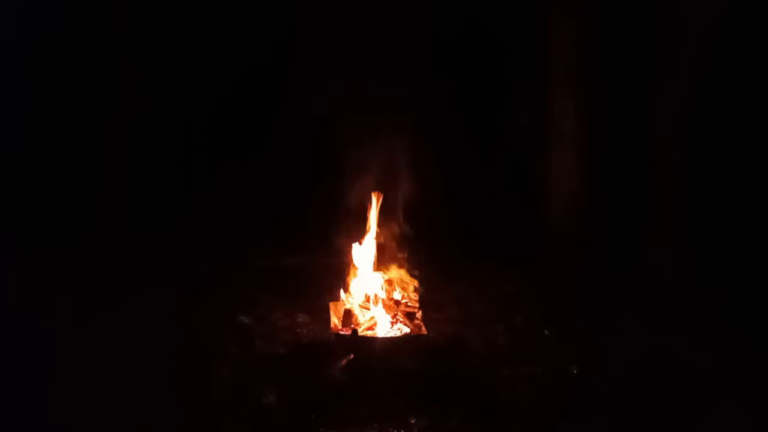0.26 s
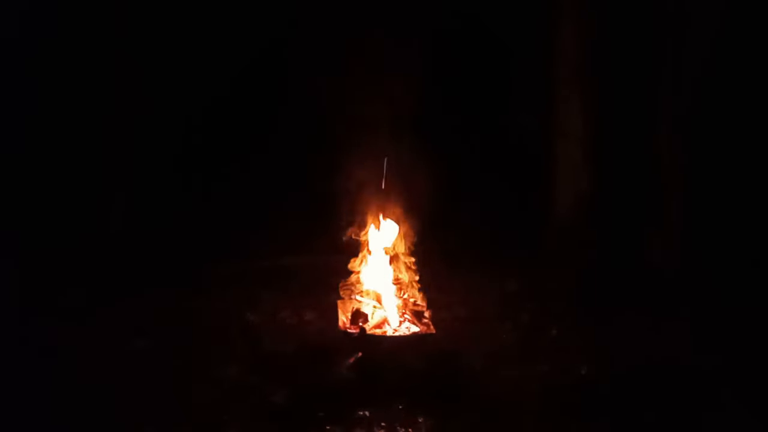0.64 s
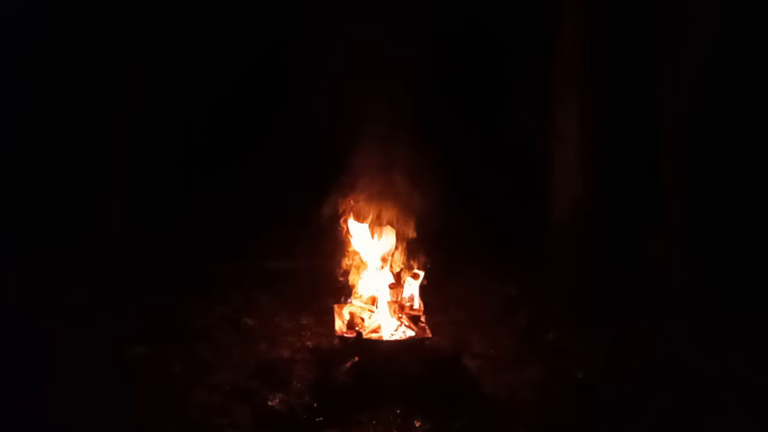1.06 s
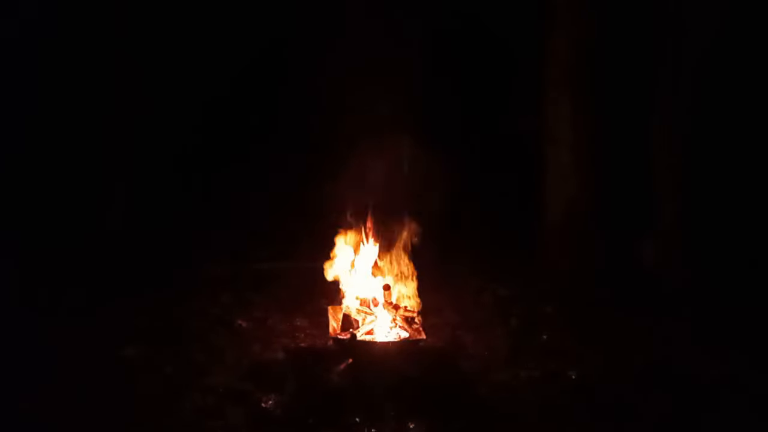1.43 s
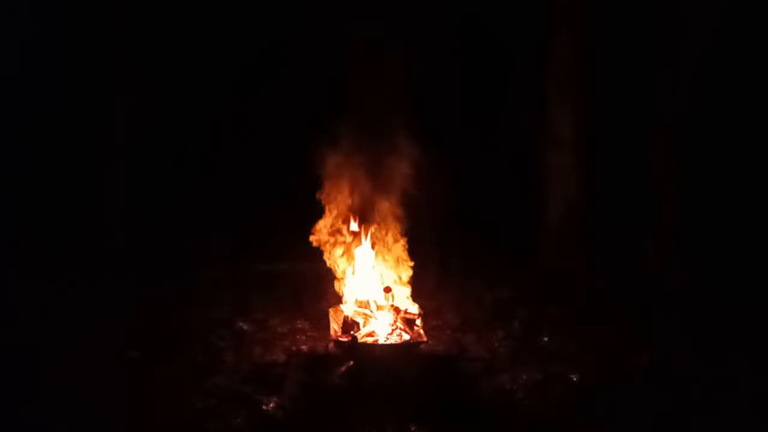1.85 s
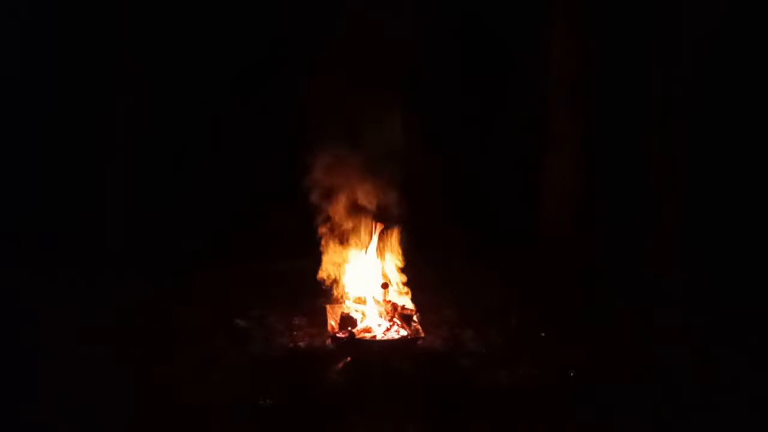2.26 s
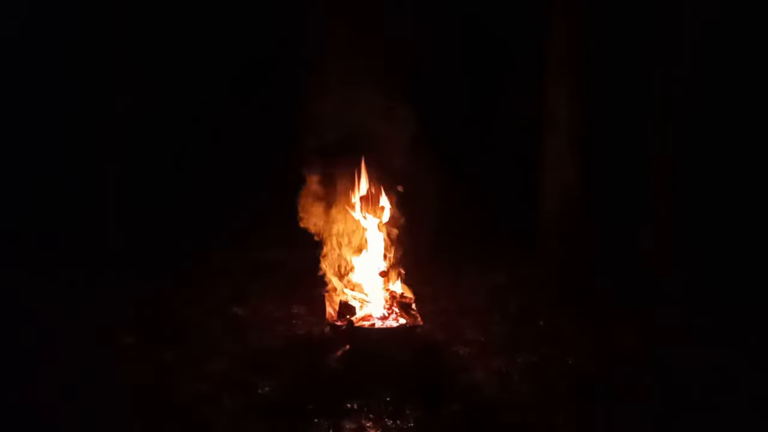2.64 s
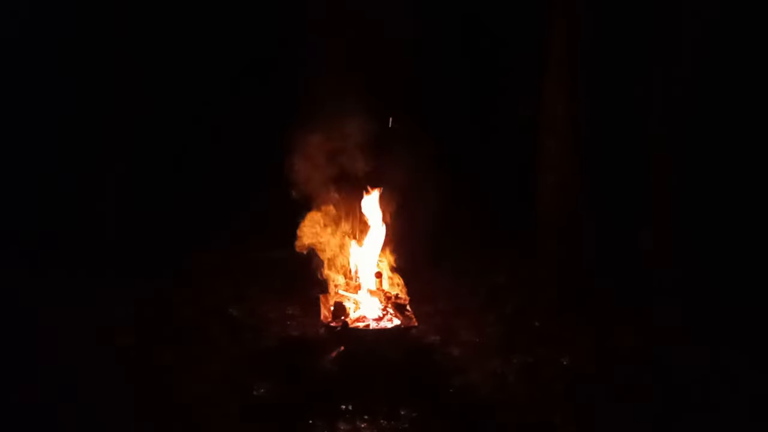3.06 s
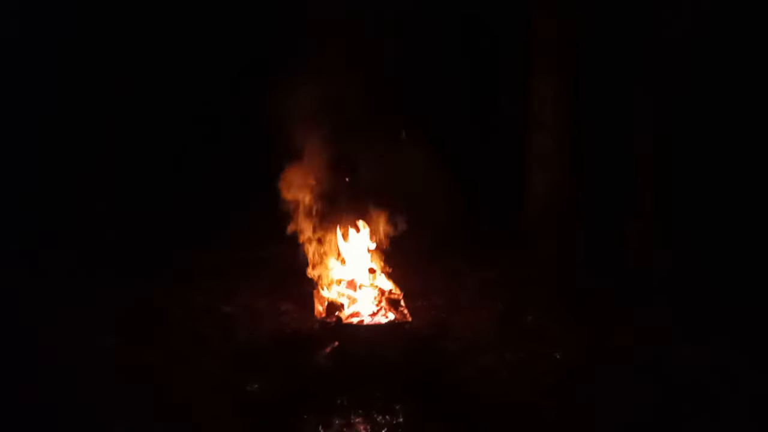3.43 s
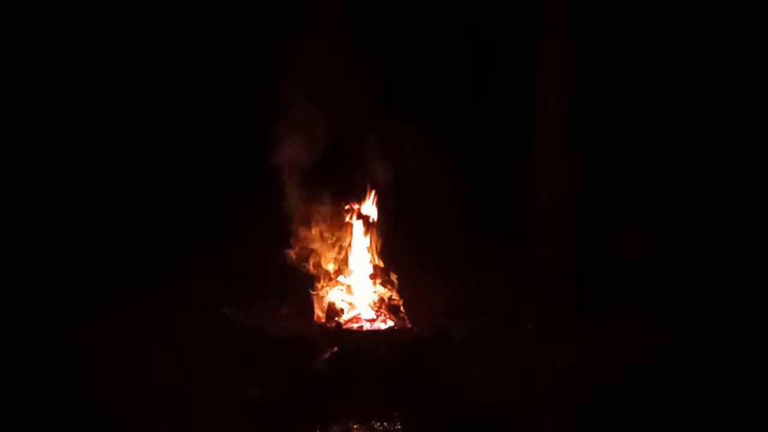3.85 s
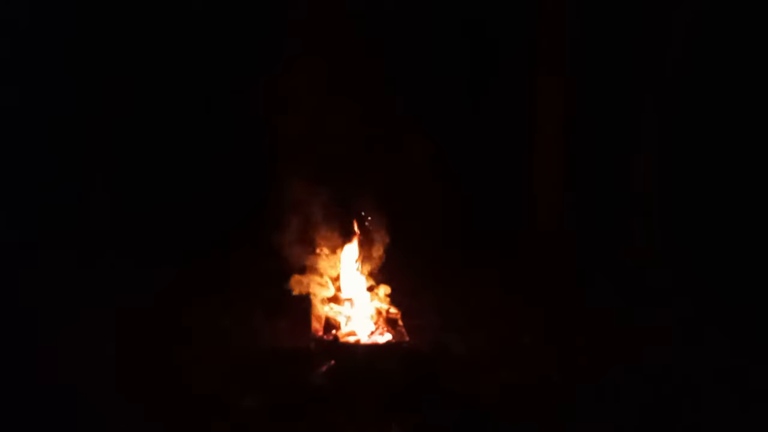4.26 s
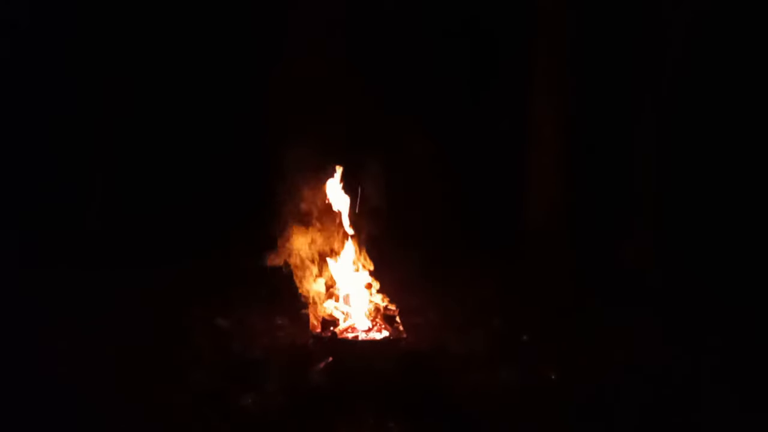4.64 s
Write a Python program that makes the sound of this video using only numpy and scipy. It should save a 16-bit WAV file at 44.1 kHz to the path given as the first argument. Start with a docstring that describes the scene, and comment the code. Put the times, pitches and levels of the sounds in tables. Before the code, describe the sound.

Fat raindrops thump and splash on stretched cloth while light rain falls on leaves and a campfire faintly sizzles and snaps.

```python
"""Heavy drips from the trees drum on a taut rain canopy overhead, in a wet wood at night.
Each one thumps the stretched cloth, knocks a panel and bursts into spray.
A few steps away a wood fire hisses and puffs, its logs snapping and spitting steam,
while fine rain patters on the leaf litter all around."""
import sys
import numpy as np
from scipy import signal
from scipy.io import wavfile

SR = 44100
rng = np.random.default_rng(int(sys.argv[2]) if len(sys.argv) > 2 else 0)


def master_out(mix):
    """Clip the mix to full scale and print it as 16-bit PCM to the path in sys.argv[1]."""
    frames = np.transpose(np.atleast_2d(mix))
    ceiling = np.clip(frames, -1, 1)
    pcm = np.round(ceiling * 32767).astype(np.int16)
    wavfile.write(sys.argv[1], SR, pcm)


N = 215857


def from_db(db):
    return 10 ** (np.asarray(db) / 20)


def rms_one(x):
    return x / np.sqrt(np.mean(x ** 2) + 1e-20)


def band(x, low_hz, high_hz):
    sos = signal.butter(2, [low_hz, min(high_hz, .45 * SR)], "band", fs=SR, output="sos")
    return signal.sosfilt(sos, x)


def fade(t, t60):
    return from_db(-60 * t / t60)


def swell(t, rise_s, t60):
    return (1 - np.exp(-t / rise_s)) * fade(t, t60)


def struck(t, hz, rise_s, t60, sag=0):
    """A briefly pushed mode that starts sharp by the fraction sag, settles and dies away."""
    turns = hz * (t + sag * rise_s * (1 - np.exp(-t / rise_s)))
    return swell(t, rise_s, t60) * np.sin(2 * np.pi * turns)


def place(times, shapes):
    """Lay each row of shapes down at its time."""
    out = np.zeros(N + shapes.shape[1])
    for start, shape in zip(times, shapes):
        out[round(start * SR):][:len(shape)] += shape
    return out[:N]


def drift(hz):
    """A slow random wander; rms 1."""
    pole = np.exp(-80 * np.pi * hz / SR)
    noise = rng.standard_normal(N // 40 + 2002)
    slow = signal.lfilter([1], [1, -2 * pole, pole * pole], noise)[2000:]
    return np.interp(np.arange(N) / 40, np.arange(len(slow)), rms_one(slow))


def grains(per_s, spread_db):
    """Two unrelated streams of random clicks with uneven sizes."""
    sizes = from_db(spread_db * np.minimum(rng.exponential(1, (2, N)), 5))
    signs = rng.choice([-1, 1], (2, N))
    return sizes * signs * (rng.random((2, N)) < per_s / SR) + 1e-18


def coloured(streams, spectrum, flicker_db):
    """Third-octave bands from two streams in turn, each with its own level and flicker; rms 1."""
    out, together = 0, drift(30)
    edges = 25 * 2 ** np.arange(0, 9.6, 1 / 3)
    hz, level_db = np.transpose(spectrum)
    for k, (low, high) in enumerate(zip(edges, edges[1:])):
        centre = np.sqrt(low * high)
        if hz[0] <= centre <= 1.2 * hz[-1]:
            band_db = np.interp(np.log(centre), np.log(hz), level_db)
            wander_db = flicker_db * (together + drift(20))
            out += from_db(band_db + wander_db) * band(streams[k % 2], low, high)
    return rms_one(out)


def ringing(clicks, low_hz, high_hz, width, tilt):
    """Clicks dealt to short resonances spread evenly in pitch; rms 1."""
    out, dealt = 0, rng.integers(0, 14, N)
    for k, hz in enumerate(np.geomspace(low_hz, high_hz, num=14)):
        share = clicks * (dealt == k) + 1e-18
        out += band(share, hz / (1 + width), hz * (1 + width)) / hz ** tilt
    return rms_one(out)


# Tone of the low end. Each row: frequency in Hz, relative spectral level in dB.
RUMBLE_TONE = [(25, -1), (45, -7), (70, 5.5), (110, 10.5), (170, -1), (260, -24)]
# Flaps of the flames. Each row: peak time in seconds, level in dB.
FLAME_PUFFS = [(0.821, -54), (1.36, -54.5), (1.57, -56), (1.9, -48.5), (2.06, -63), (2.5, -47), (2.63, -65),
               (3.3, -64), (3.87, -55)]


def rumble(heave_power):
    """A low floor that swells as the flames flap and the canopy heaves."""
    t = np.arange(N) / SR
    floor_db, puff_width_s = -74, .016
    power = from_db(floor_db) ** 2 + heave_power
    for peak_s, db in FLAME_PUFFS:
        power += from_db(db) ** 2 * np.exp(-((t - peak_s) / puff_width_s) ** 2)
    return np.sqrt(power) * coloured(rng.standard_normal((2, N)), RUMBLE_TONE, flicker_db=1.0)


def leaf_ticks():
    """Small drops land on nearby leaves as short ticks of uneven colour."""
    clicks = grains(per_s=400, spread_db=4.0)[0]
    return from_db(-72.5) * ringing(clicks, 957, 8900, width=.2, tilt=1.0)


# Fader moves for the two beds. Each row: time in seconds, rain patter in dB, fire hiss in dB.
BED_LEVELS = [(0.0, -55.5, -56.5), (0.2, -57.5, -55.5), (0.5, -50, -55), (0.9, -55.5, -54), (1.3, -57, -54),
              (1.75, -53.5, -53.5), (2.2, -55.5, -54.5), (2.35, -54.5, -51.5), (2.47, -49.5, -46.5),
              (2.65, -49.5, -52.5), (2.92, -58, -54.5), (3.3, -53, -56.5), (3.75, -56, -56.5),
              (4.05, -56.5, -56), (4.22, -55, -52), (4.5, -56, -55), (4.89, -58.5, -56.5)]


def bed_gains():
    """The patter and the hiss each ride gently up and down."""
    times, *levels = np.transpose(BED_LEVELS)
    return [from_db(np.interp(np.arange(N) / SR, times, db)) for db in levels]


# Tone of rain on leaf litter. Each row: frequency in Hz, relative spectral level in dB.
PATTER_TONE = [(130, 4.5), (230, 13.5), (410, 6.5), (650, 10), (1300, 10), (2500, 9), (4000, 6), (6000, 8),
               (8000, -4), (12000, -20)]


def rain_patter(gain, runoff_power):
    """Fine rain on the leaf litter, joined by spray that each drip shakes loose."""
    drops = grains(per_s=1800, spread_db=1.93)
    return np.sqrt(gain ** 2 + runoff_power) * coloured(drops, PATTER_TONE, flicker_db=2.0)


# Tone of the fire's hiss. Each row: frequency in Hz, relative spectral level in dB.
HISS_TONE = [(4000, 17), (7000, -20), (9000, 10.5), (16000, 17.5)]


def fire_hiss(gain):
    """The fire sizzles with a dense, bright stream of tiny clicks."""
    return gain * coloured(grains(per_s=9000, spread_db=4.6), HISS_TONE, flicker_db=1.5)


# Snaps of the logs. Each row: start in seconds, treble gain in dB, top-end gain in dB,
# time for the spit to fall 60 dB in seconds.
LOG_SNAPS = [(0.3604, -32, -49, 0.011), (0.375, -25.5, -30, 0.06), (0.39, -42, -45, 0.057),
             (0.523, -39, -32, 0.055), (0.6125, -31.5, -24, 0.04), (0.7869, -32.5, -20.5, 0.016),
             (0.9835, -42, -24, 0.035), (0.9902, -52, -39, 0.028), (1.3064, -33.5, -26, 0.017),
             (1.322, -40, -29, 0.038), (1.3527, -40.5, -46, 0.031), (1.6663, -42, -30, 0.02),
             (1.9974, -34, -45, 0.011), (2.038, -41.5, -30.5, 0.13), (2.1643, -37, -15, 0.014),
             (2.1785, -39, -34, 0.047), (2.1837, -31.5, -33, 0.024), (2.287, -36, -41, 0.034),
             (2.3915, -47, -33, 0.049), (2.4589, -43.5, -43, 0.14), (2.49, -36.5, -27, 0.1),
             (2.534, -41, -46, 0.02), (2.7165, -34, -32, 0.045), (2.795, -36.5, -31, 0.038),
             (2.804, -49, -27, 0.046), (3.17, -35.5, -32, 0.029), (3.1835, -37, -51, 0.027),
             (3.692, -41, -52, 0.076), (3.838, -52, -31, 0.039), (3.845, -36.5, -40, 0.054),
             (3.872, -43, -33, 0.08), (3.8778, -49, -37, 0.085), (3.9342, -37, -39, 0.026),
             (3.9704, -32, -50, 0.014), (4.1028, -37.5, -48, 0.021), (4.144, -43, -42, 0.13),
             (4.198, -37, -55, 0.052), (4.316, -53, -29, 0.023)]


def log_snaps():
    """A cell of wood bursts with a click and vents a short spit of steam."""
    start, treble_db, top_db, spit_t60 = np.transpose(LOG_SNAPS)[:, :, None]
    t = np.arange(round(.08 * SR)) / SR
    click = fade(t, t60=.004)
    spit = from_db(-1.5) * swell(t, rise_s=.001, t60=spit_t60)
    bursts = rng.standard_normal((len(LOG_SNAPS), 2, len(t))) * (click + spit)[:, None]
    treble = from_db(treble_db) * band(bursts[:, 0], 5500, 12000)
    top = from_db(top_db) * band(bursts[:, 1], 13250, .45 * SR)
    return place(start[:, 0], treble + top)


def spray(t, count):
    """Droplets fly off each drip: ten tiny rings of chance pitch, size and delay, most of them early."""
    pitch, size, lag = rng.random((count, 3, 10, 1)).transpose(1, 0, 2, 3)
    since = np.maximum(t - .002 * lag ** 2.553, 0)
    rings = struck(since, 1300 * 5.5 ** pitch, rise_s=.0018, t60=.005)
    return (from_db(-14 * size) * rings).sum(axis=1)


def crack(t, lag_s=.000793, width_s=.00005):
    """The drop bursts with one hard pressure swing of height 1."""
    u = (t - lag_s) / width_s
    return -u * np.exp((1 - u ** 2) / 2)


# Cloth rustle bands, following the thump, knock and spray in that order. Each row: lowest and
# highest resonance in Hz, level against that part of the drip in dB, time to fall 60 dB in seconds.
RUSTLE_BANDS = [(164, 386.4, -17.5, 0.091), (431, 1348, -14, 0.052), (1300, 6350, -21.5, 0.099)]


def cloth_rustle(thump_db, knock_db, spray_db):
    """The cloth rustles on after each drip."""
    out = 0
    for (low_hz, high_hz, offset_db, t60), db in zip(RUSTLE_BANDS, (thump_db, knock_db, spray_db)):
        power = after_drips(db + offset_db, rise_s=.0035, t60=t60)
        clicks = grains(per_s=3000, spread_db=1.6)[0]
        out += np.sqrt(power) * ringing(clicks, low_hz, high_hz, width=.03, tilt=.4)
    return out


# Drips on the canopy. Each row: start in seconds, thump gain in dB and pitch in Hz, knock gain in dB
# and pitch in Hz, splash gain in dB and pitch in Hz, spray gain in dB.
CANOPY_DRIPS = [(0.0107, -54, 204, -34.5, 666, -33, 1750, -26),
                (0.0928, -49, 211, -33.5, 1260, -32, 3180, -27.5),
                (0.1116, -42, 410, -32.5, 1195, -36, 3200, -27.5),
                (0.2848, -16, 263, -33.5, 434, -21.5, 2720, -22.5),
                (0.3474, -33, 420, -36, 1190, -43, 1490.0, -24),
                (0.361, -23, 268, -17.5, 713, -18.5, 1300.0, -18.5),
                (0.384, -40, 304, -25, 692, -32, 1300.0, -37), (0.447, -45, 230, -29, 1010, -27, 2520, -32),
                (0.4525, -19.5, 224, -21.5, 437, -15.5, 3680, -14.5),
                (0.515, -24.5, 286, -25, 483, -16, 2540, -18.5),
                (0.534, -18, 244, -18.5, 470, -14.5, 1500, -12),
                (0.564, -34, 226, -29.5, 655, -24, 1650, -19.5),
                (0.6124, -60, 170.0, -54, 1280.0, -25.5, 6070, -57),
                (0.641, -20.5, 207, -21, 457, -28, 6470, -26.5),
                (0.7653, -49, 222, -31.5, 730, -31, 1300.0, -33),
                (0.7839, -44, 208, -30, 1300.0, -56, 1300.0, -30),
                (0.8927, -29, 324, -63, 525, -39, 5100, -34),
                (0.9293, -34, 278, -35, 490, -33, 1780, -22.5),
                (0.9899, -34, 172, -38, 1300.0, -19, 4180, -14.5),
                (1.012, -48, 275, -27.5, 1300.0, -36, 4000, -55),
                (1.1063, -20.5, 248, -69, 480.0, -32, 2760, -34.5),
                (1.1367, -34.5, 220, -34.5, 1210, -49, 1300.0, -28),
                (1.2633, -58, 256, -41.5, 675, -39, 6100, -26.5),
                (1.3046, -44, 300.0, -26, 497, -24, 1800, -20.5),
                (1.321, -16, 243, -19, 627, -17, 2370, -14.5), (1.5789, -23, 242, -29, 704, -34, 1520, -36),
                (1.606, -22.5, 250, -15, 930, -17, 1760, -20),
                (1.6172, -54, 274, -22.5, 780, -20.5, 1870, -37),
                (1.6407, -34, 346, -24.5, 890, -19, 1980, -19),
                (1.6834, -28.5, 260.0, -32, 490, -40, 1730, -24),
                (1.7111, -45, 310.0, -32, 550, -26.5, 2580, -25.5),
                (1.8013, -24, 234, -46, 590, -17, 2590, -17),
                (1.835, -29.5, 250.0, -42, 746, -33, 2660, -43),
                (1.8655, -36, 355, -51, 480.0, -32, 2130, -32),
                (1.877, -28.5, 363, -47, 585, -41, 1970, -18.5),
                (1.8886, -20.5, 241, -28, 456, -24, 3750, -27),
                (1.9674, -51, 200.0, -41, 1240, -39, 1300.0, -35),
                (1.984, -50, 284, -41, 1310, -28, 4700, -35),
                (2.0147, -41, 390, -53, 670, -33, 3350.0, -24.5),
                (2.1692, -54, 300.0, -55, 1280, -36, 3980, -32),
                (2.2863, -23.5, 232, -19, 575, -22, 5680, -23),
                (2.3536, -18, 208, -7, 664, -51, 1300.0, -21.5),
                (2.3753, -30, 193, -23, 620, -31, 1900, -17),
                (2.3914, -21.5, 230, -23, 593, -25, 3870, -15.5),
                (2.4603, -31.5, 190.0, -48, 890, -27.5, 3700, -31),
                (2.467, -41, 212, -36, 880, -48, 1600, -21.5), (2.48, -30, 178, -35, 760, -28, 3170, -23),
                (2.4919, -30.5, 193, -44, 596, -27, 3650, -24),
                (2.5952, -31, 206, -38, 474, -28.5, 3250, -46),
                (2.6315, -32.5, 355, -42, 640, -30.5, 4140, -35.5),
                (2.6543, -49, 270.0, -31, 497, -34, 2700, -30),
                (2.7216, -28.5, 245, -23.5, 440, -33, 1540, -26),
                (2.7354, -33, 225, -27.5, 720.0, -43, 4070, -52),
                (2.796, -28, 220, -28, 483, -28.5, 4950, -24),
                (2.9742, -20, 249, -20, 493, -9.5, 3000, -16.5), (3, -61, 260.0, -44, 1190, -29, 6670, -31),
                (3.087, -34, 300.0, -32.5, 666, -27.5, 2720, -27.5),
                (3.1654, -27, 234, -24.5, 900, -31, 2050, -23),
                (3.1702, -23.5, 214, -11.5, 630, -14, 3190, -12),
                (3.2042, -20, 213, -16.5, 536, -31, 6700, -22),
                (3.2721, -35, 298, -33, 574, -22.5, 1540, -22),
                (3.288, -17, 277, -24, 429, -15.5, 3140, -16.5),
                (3.409, -33.5, 252, -40, 774, -36, 4940, -20), (3.43, -25, 246, -11.5, 968, -23, 2720, -15),
                (3.5592, -33.5, 235, -33.5, 764, -22.5, 1790, -25),
                (3.6924, -34, 290, -29.5, 1124, -22.5, 1510, -23),
                (3.7227, -42.5, 225, -33, 980, -32, 2180, -35.5),
                (3.8459, -19.5, 253, -27.5, 470, -17.5, 1970, -19.5),
                (3.8627, -17.5, 254, -24.5, 440, -16.5, 2840, -12.5),
                (3.967, -20, 248, -14, 632, -17, 1620, -12.5),
                (3.9848, -26, 306, -25.5, 524, -22, 1460, -27),
                (4.005, -20.5, 250, -14.5, 783, -14, 1300.0, -15),
                (4.022, -36, 354, -33, 810, -39, 2900, -43),
                (4.044, -26.5, 266, -24, 480, -45, 1680.0, -29),
                (4.1042, -16.5, 213, -24, 714, -26, 1590, -19.5),
                (4.1452, -29, 270, -28, 527, -28, 2260, -22.5),
                (4.191, -58, 340.0, -37.5, 1250, -33, 2200, -30.5),
                (4.474, -42.5, 173, -34.5, 984, -33.5, 3100, -36),
                (4.565, -43, 223, -56, 885, -46, 1780.0, -26.5),
                (4.6556, -24, 486, -15, 620, -13, 1300.0, -14),
                (4.7732, -44.5, 230, -38.5, 1300.0, -27.5, 3490, -19),
                (4.7918, -52, 240, -51, 1230, -25.5, 1760, -24.5)]


def canopy_drips():
    """A drip thumps the stretched cloth, knocks the panel it lands on, rings as it bursts and sprays."""
    columns = np.transpose(CANOPY_DRIPS)[:, :, None]
    start, thump_db, thump_hz, knock_db, knock_hz, splash_db, splash_hz, spray_db = columns
    t = np.arange(round(.1 * SR)) / SR
    thump = from_db(thump_db) * struck(t, thump_hz, rise_s=.0013, t60=.027, sag=.66)
    knock = from_db(knock_db) * struck(t, knock_hz, rise_s=.0004, t60=.009)
    faint_ring = from_db(knock_db - 25.5) * struck(t, knock_hz, rise_s=.0004, t60=.13)
    splash = from_db(splash_db) * struck(t, splash_hz, rise_s=.0013, t60=.013)
    burst = from_db(spray_db) * (spray(t, len(start)) + from_db(-12) * crack(t))
    hits = place(start[:, 0], thump + knock + faint_ring + splash + burst)
    rustle = cloth_rustle(thump_db, knock_db, spray_db)
    low_cut = signal.butter(3, 138, "high", fs=SR, output="sos")   # open cloth radiates no deep bass
    return signal.sosfilt(low_cut, hits + rustle)


def after_drips(level_db, rise_s, t60):
    """Power that swells and dies after every drip."""
    t = np.arange(SR // 4) / SR
    tails = from_db(level_db).reshape(-1, 1) * swell(t, rise_s, t60)
    return place(np.transpose(CANOPY_DRIPS)[0], tails ** 2)


def scene():
    """Mono mix of rain, fire and drips; each drip also shakes spray loose and heaves the whole canopy."""
    _, thump_db, *_, spray_db = np.transpose(CANOPY_DRIPS)
    runoff_power = after_drips(spray_db - 27.5, rise_s=.0042, t60=.14)
    heave_power = after_drips(thump_db - 31, rise_s=.005, t60=.08)
    patter_gain, hiss_gain = bed_gains()
    beds = rain_patter(patter_gain, runoff_power) + fire_hiss(hiss_gain)
    return (beds + canopy_drips() + log_snaps() + leaf_ticks() + rumble(heave_power))[None]


# Resonances and dips of the microphone port. Each row: centre in Hz, width in Hz, gain in dB.
PORT_EQ = [(9770, 2470, 12.5), (12250, 1430, -9), (13740, 3100, -24), (15800, 1600, -2.5)]


def record(dry):
    """The microphone port colours the treble; the top is cut in two steps."""
    for hz, width_hz, db in PORT_EQ:
        angle, gain = 2 * np.pi * hz / SR, from_db(db / 2)
        width = np.sin(angle) * width_hz / hz / 2
        dry = signal.lfilter([1 + width * gain, -2 * np.cos(angle), 1 - width * gain],
                             [1 + width / gain, -2 * np.cos(angle), 1 - width / gain], dry)
    shelf = signal.ellip(7, .5, 22, 15750, fs=SR, output="sos")
    high_cut = signal.cheby2(14, 40, 16800, fs=SR, output="sos")
    return signal.sosfilt(high_cut, signal.sosfilt(shelf, dry))


dry = scene()
out = record(dry)
master_out(out)
```